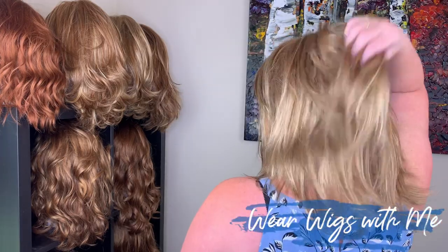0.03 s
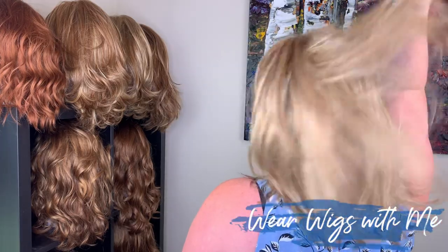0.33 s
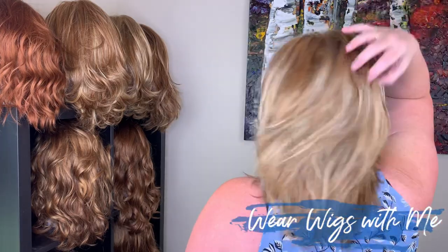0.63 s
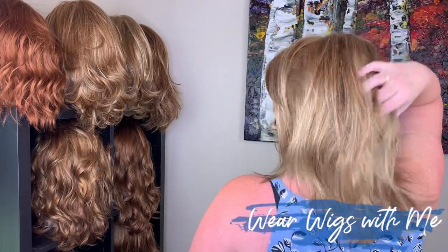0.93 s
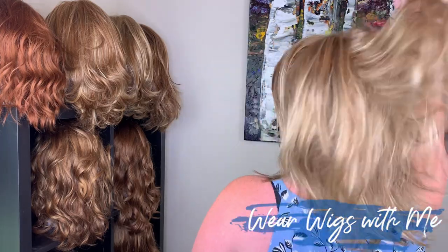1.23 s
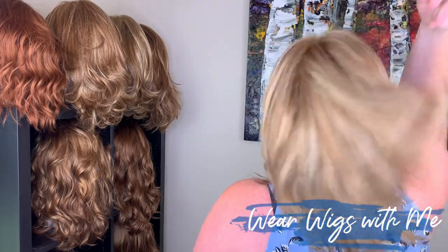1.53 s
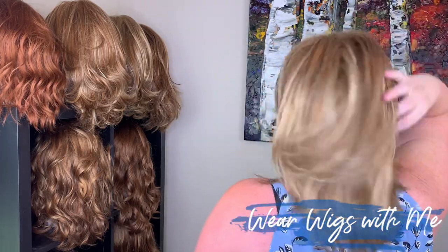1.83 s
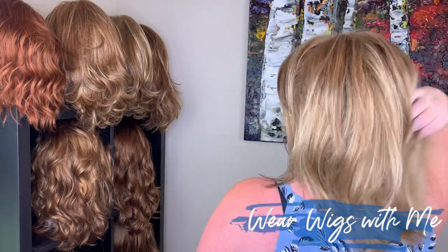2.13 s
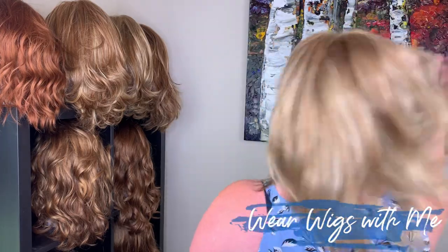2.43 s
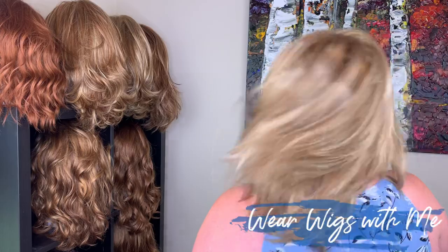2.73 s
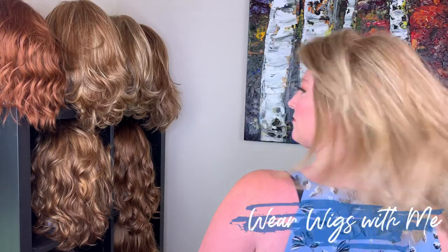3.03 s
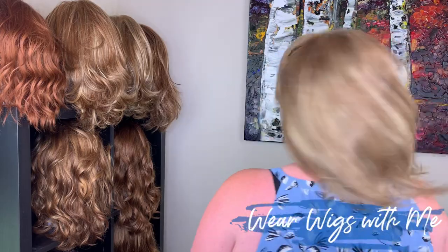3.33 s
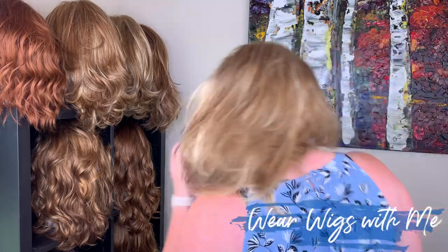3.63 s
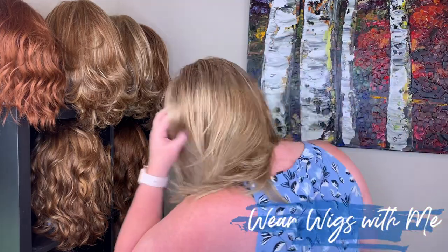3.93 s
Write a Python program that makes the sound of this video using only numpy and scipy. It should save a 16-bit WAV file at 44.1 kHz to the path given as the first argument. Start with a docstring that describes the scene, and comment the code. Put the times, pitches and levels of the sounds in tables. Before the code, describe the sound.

Hair swishes faintly as fingers comb through a wig, in several strokes over the first 1.5 seconds and a longer one from about 2.1 seconds. Strands give tiny ticks around 2.7 seconds, and the ends brush a shoulder twice just after 3. A crisper, close sweep with ticks runs from 3.5 seconds to the end. A steady ventilation rumble, faint electrical buzz and hiss continue underneath.

```python
"""Fingers comb, lift and shake the hair of a wig, and countless sliding strands make soft swishes.
Caught strands snap free with tiny ticks, the ends flick over a shoulder, and a crisper sweep
beside the face comes last. Under it, in a quiet room, lie a steady ventilation rumble,
a faint electrical buzz and microphone hiss."""
import sys
import numpy as np
from scipy import signal
from scipy.fft import rfft, irfft, next_fast_len
from scipy.io import wavfile
from scipy.ndimage import map_coordinates

SR = 44100
rng = np.random.default_rng(int(sys.argv[2]) if len(sys.argv) > 2 else 0)


def wav_out(sig):
    """Save sig, one row per channel (or a flat mono array), as 16-bit PCM at SR to the path in sys.argv[1]."""
    wavfile.write(sys.argv[1], SR, np.round(np.clip(np.atleast_2d(sig).T, -1, 1) * 32767).astype(np.int16))


N = 176400
T = np.arange(N) / SR

# fingers sliding through the hair
# (start [s], rise [s], hold [s], fall [s], level [dB], brightness [dB per octave])
STROKES = [(-.06, 0.085, 0.17, 0.21, -61.5, 0), (0.298, .05, .05, 0.16, -67.5, -6),
           (0.677, 0.018, .025, 0.07, -64, -3.5), (0.743, 0.039, 0.054, 0.19, -66, -2),
           (0.918, .08, .025, 0.13, -62.5, -1.5), (1.054, 0.082, 0.15, 0.24, -66.5, -0.5),
           (1.78, .03, .04, .2, -76, -1), (2.07, .025, .03, .06, -66.5, -8),
           (2.137, 0.11, 0.38, .32, -69.5, -2)]
# a handful of hair swept back close by (start [s], rise [s], hold [s], fall [s], level [dB])
SWEEPS = [(3.525, .16, .07, .25, -58.5), (3.644, 0.04, 0.0085, 0.01, -56.5),
          (3.76, .018, 0.0089, 0.022, -60), (3.836, 0.0079, 0.0059, 0.011, -60)]
# hair ends flicking as the head turns (start [s], rise [s], hold [s], fall [s], level [dB])
FLICKS = [(2.99, 0.052, .015, 0.12, -62.5), (3.096, 0.096, .03, 0.078, -65)]
# single strands snapping free (time [s], level before tone shaping [dB])
TICKS = [(2.6666, -50), (2.788, -53.5), (2.843, -54), (3.221, -60), (3.299, -53), (3.703, -43),
         (3.726, -42.5), (3.793, -46), (3.846, -50)]
# the tone of each sound, from low to high (frequency [Hz], relative level [dB])
COMB_TONE = [(500, -33), (1500, -8.5), (3000, -3), (4400, -1), (5400, 1), (6000, -1.5), (6700, -6.5),
             (7900, -3), (9800, -3.5), (10500, -16), (12000, -13), (13200, -7), (15500, -14)]
SWEEP_TONE = [(600, -18), (2000, -4), (4000, -6.5), (5500, -1), (6800, -6), (7900, -.5), (9800, 0.5),
              (10500, -8), (11400, -11), (12700, -6), (15500, -24)]
FLICK_TONE = [(900, -11), (2000, 2), (3300, 1), (4300, -2), (6100, -2), (7000, -10), (12000, -24)]
TICK_TONE = [(1500, -22), (4500, -9), (7000, 1), (9600, 5), (10800, -16), (15500, -18)]
RUMBLE_TONE = [(10, -6), (30, 0), (60, 0), (100, -5), (150, -10.5), (200, -15), (300, -20.5), (500, -27),
               (700, -31.5), (1000, -36.5), (2000, -46.5), (5000, -59.5), (15000, -83)]
BUZZ_TONE = [(600, -24), (1000, -3), (1400, -3), (1850, -1.5), (2300, 7.5), (3100, 2), (4200, -2.5),
             (6500, -9), (9500, -9.5), (15000, -15)]
HISS_TONE = [(300, -8.5), (1500, 2), (2700, 0.5), (4000, -1.5), (5700, -2), (6600, -4.5), (9500, -4),
             (11000, -5.5), (15500, -6)]
# notes that stand out of the buzz (multiple of the mains frequency, level [dB])
HUM_NOTES = [(2, -61), (17, -80.5), (27, -86), (31, -84)]

MAINS_HZ, TOP_HZ = 60, 15720


def combing():
    """Each finger stroke is a soft swish; the brighter ones stand for faster fingers."""
    swishes = np.zeros(N)
    for *shape, brightness in STROKES:
        slips = strands(slips_per_s=3000, spread_db=6, smooth=0.66)
        swishes += gesture(*shape) * unit(coloured(slips, COMB_TONE, brightness))
    return swishes * amp(0.64 * wobble(27.64))


def strands(slips_per_s, spread_db, smooth):
    """Strands slip on each other in tiny clicks; smooth (0 to 1) blends them into an even hush."""
    clicks = (rng.random(N) < slips_per_s / SR) * rng.choice([-1, 1], N)
    slips = clicks * amp(spread_db * rng.standard_normal(N))
    return np.sqrt(1 - smooth) * unit(slips) + np.sqrt(smooth) * rng.standard_normal(N)


def sweeping():
    """Close hair crackles finely as lock after lock slides off the hand."""
    slips = strands(slips_per_s=1500, spread_db=4.5, smooth=.45) * amp(1.1 * wobble(160))
    loudness = np.sqrt(sum(gesture(*row) ** 2 for row in SWEEPS))  # overlapping sweeps add in power
    return loudness * unit(coloured(slips, SWEEP_TONE))


def flick():
    """Swinging hair brushes the shoulder with a duller swish."""
    slips = strands(slips_per_s=1300, spread_db=8, smooth=0.64)
    loudness = sum(gesture(*row) for row in FLICKS) * amp(0.99 * wobble(40))
    return loudness * unit(coloured(slips, FLICK_TONE))


def ticks(decay_s=0.0013):
    """Each caught strand lets go with a tiny crack of noise."""
    loudness = sum(amp(db) * (T >= start) * np.exp(-np.abs(T - start) / decay_s) for start, db in TICKS)
    return coloured(loudness * rng.standard_normal(N), TICK_TONE)


def room(x, fade_s=.25, echo_db=-11):
    """Nearby walls add a short echo that drops by 60 dB in fade_s."""
    t = T[:SR // 2]
    tail = rng.standard_normal(len(t)) * amp(-60 * t / fade_s)
    return x + amp(echo_db) * signal.fftconvolve(x, tail / np.linalg.norm(tail))[:N]


def ventilation(rumble_db=-40, fan_hz=54, fan_db=-57):
    """The ventilation rumbles, and its fan adds a low, slightly wavering note."""
    rumble = unit(coloured(rng.standard_normal(N), RUMBLE_TONE))
    drone = unit(np.sin(2 * np.pi * fan_hz * T + 0.69 * wobble(3.08)))
    return amp(rumble_db) * rumble + amp(fan_db) * drone


def mains_buzz(buzz_db=-75.3):
    """Mains electricity buzzes with one spike up and one down per cycle, plus a few steady notes."""
    odd_multiples = np.arange(1, TOP_HZ // MAINS_HZ, 2)
    cycle = np.arange(SR // MAINS_HZ) * MAINS_HZ / SR
    phases = 0.6 * rng.standard_normal(len(odd_multiples))  # smears the spikes a little
    spikes = np.cos(2 * np.pi * np.outer(cycle, odd_multiples) + phases).sum(1)
    buzz = unit(coloured(np.resize(spikes, N), BUZZ_TONE))
    hum = sum(amp(db) * unit(np.sin(2 * np.pi * k * MAINS_HZ * T)) for k, db in HUM_NOTES)
    return amp(buzz_db) * buzz + hum


def hiss(level_db=-65.5):
    """The microphone adds a faint, even noise of its own."""
    return amp(level_db) * unit(coloured(rng.standard_normal(N), HISS_TONE))


def gesture(start, rise, hold, fall, db):
    """The loudness of one touch: it swells, holds and eases off."""
    up = np.clip((T - start) / rise, 0, 1)
    down = np.clip(1 - (T - start - rise - hold) / fall, 0, 1)
    return amp(db) * up * down


def wobble(rate):
    """A smooth curve through random values, rate of them each second."""
    return map_coordinates(rng.standard_normal(1024), [T * rate], mode="mirror")


def coloured(x, tone, tilt_db=0):
    """Shape x with a tone table; a tilt below zero (dB per octave) makes it duller."""
    freqs, levels = np.transpose(tone)
    tilted = levels + tilt_db * np.log2(freqs / freqs.mean())
    return filtered(x, lambda hz: amp(np.interp(np.log(hz + 1), np.log(freqs), tilted)))


def filtered(x, gain_at):
    """Turn each frequency in x up or down by gain_at(frequency)."""
    size = next_fast_len(N + SR // 2)
    return irfft(rfft(x, size) * gain_at(np.fft.rfftfreq(size, 1 / SR)), size)[:N]


def amp(db):
    """Turn decibels into a number to multiply by."""
    return 10 ** (np.asarray(db) / 20)


def unit(x):
    """Scale x to an average strength (rms) of 1."""
    return x / np.sqrt(np.mean(x ** 2) + 1e-20)


def scene():
    """The hair in the room over the steady background, in one channel."""
    hair = combing() + sweeping() + flick() + ticks()
    return (room(hair) + ventilation() + hiss() + mains_buzz())[None]


def record(dry):
    """Cut away all the treble above TOP_HZ."""
    return np.array([filtered(channel, lambda hz: hz < TOP_HZ) for channel in dry])


dry = scene()
out = record(dry)
wav_out(out)
```